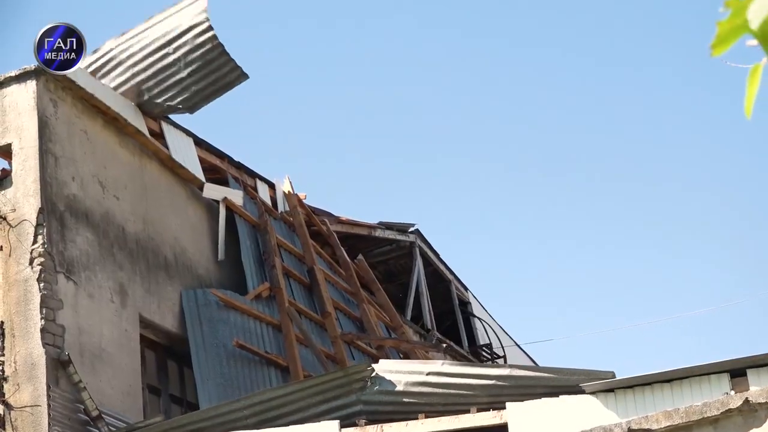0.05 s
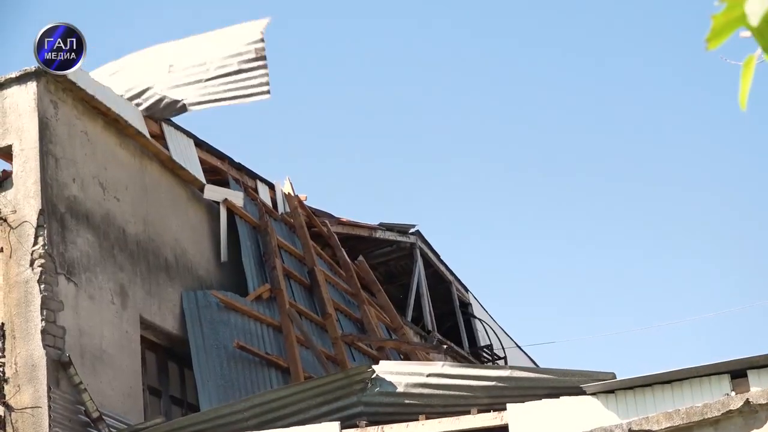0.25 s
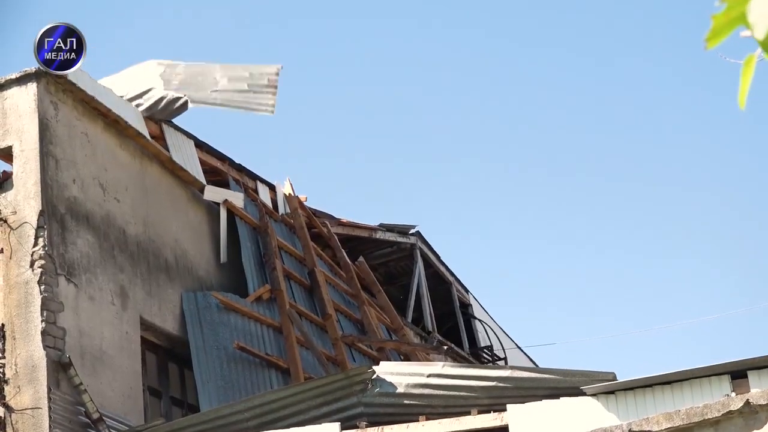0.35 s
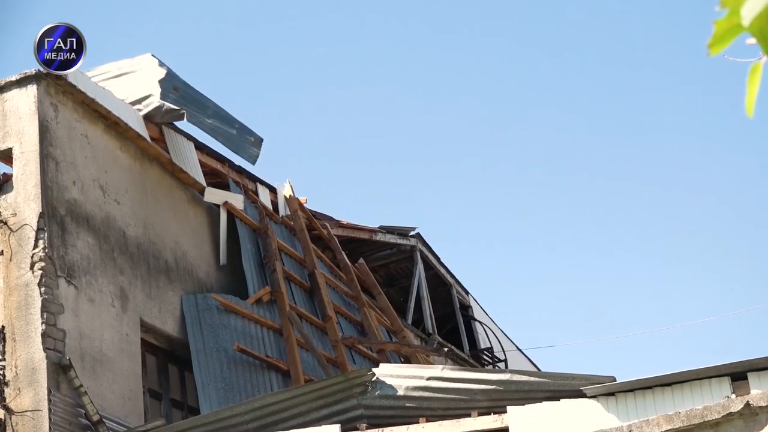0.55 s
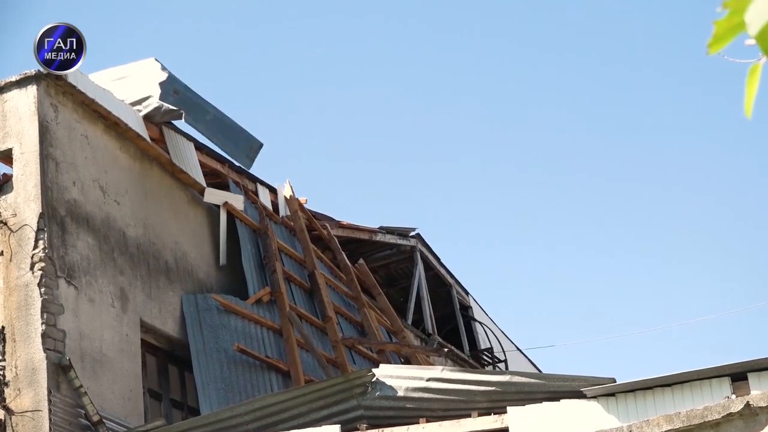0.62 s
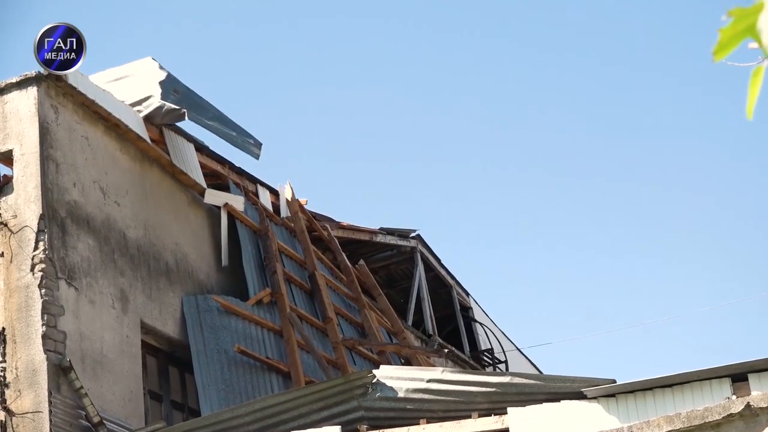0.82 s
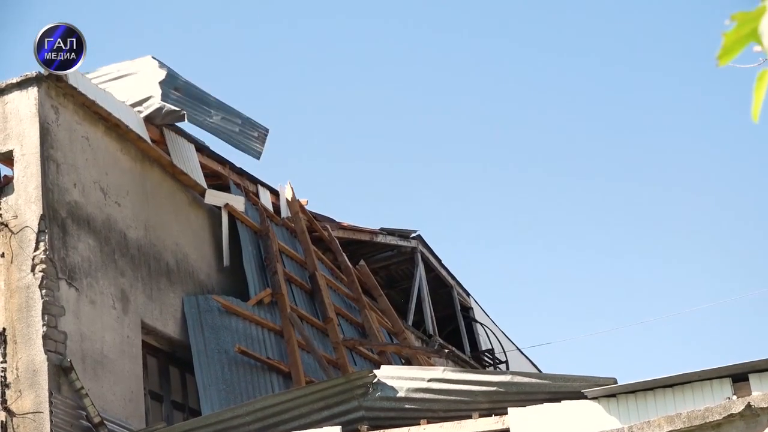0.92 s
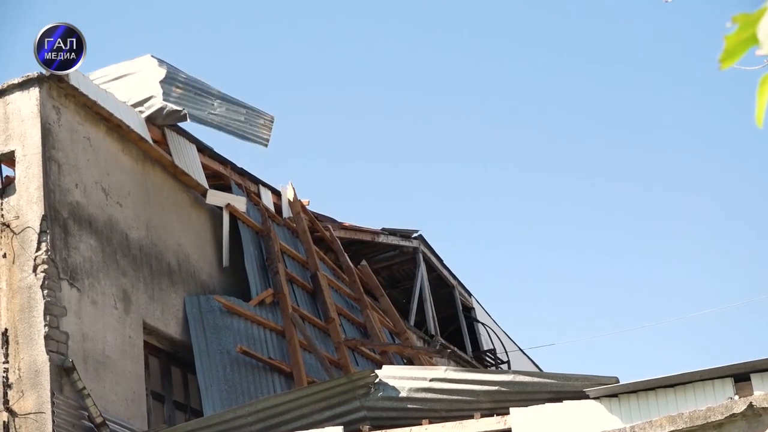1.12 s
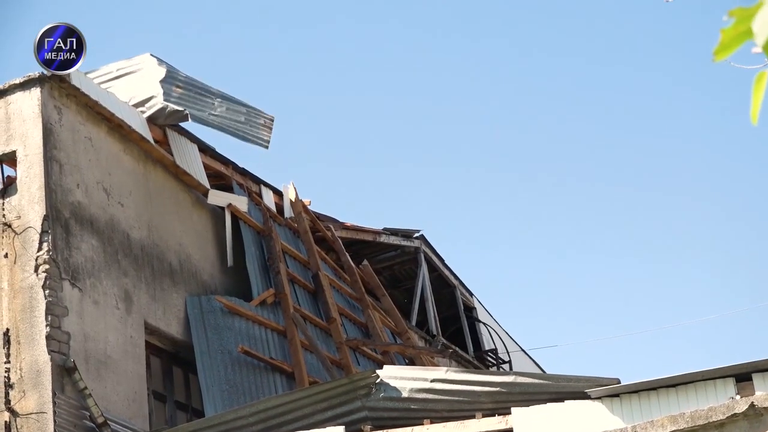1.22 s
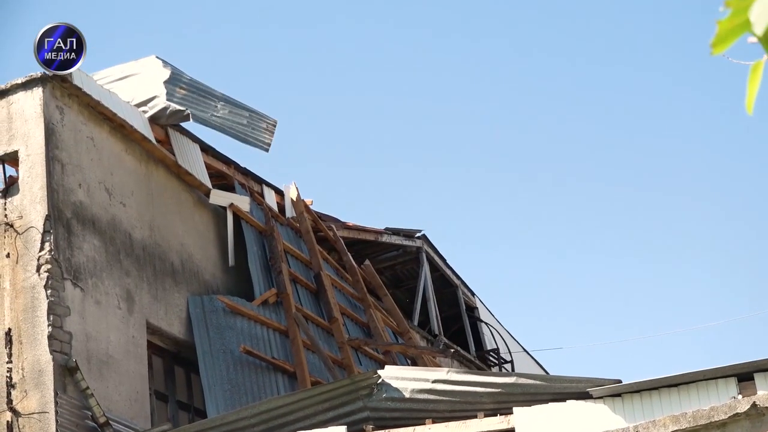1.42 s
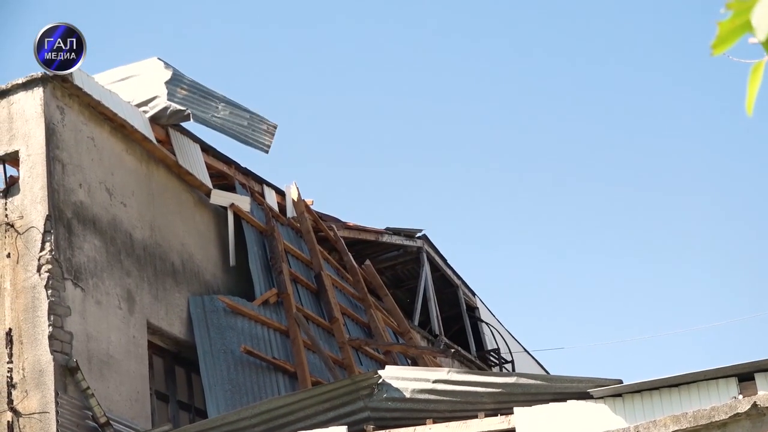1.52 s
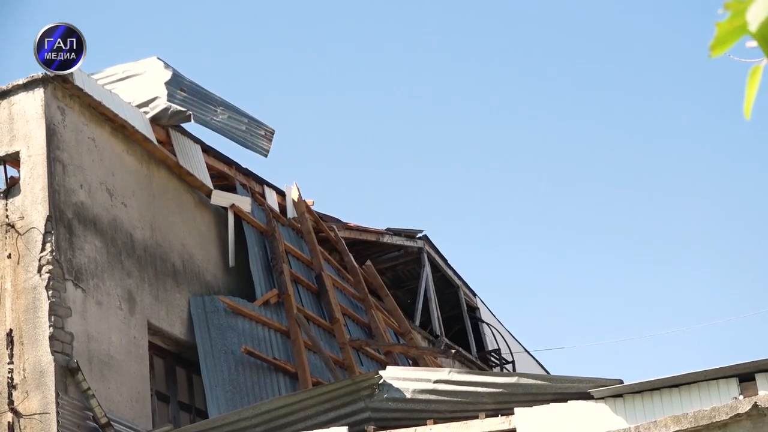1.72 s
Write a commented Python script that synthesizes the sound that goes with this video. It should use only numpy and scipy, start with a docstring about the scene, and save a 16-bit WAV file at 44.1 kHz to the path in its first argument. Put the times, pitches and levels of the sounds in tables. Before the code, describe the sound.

A loose corrugated metal sheet bangs on roof timbers in a quick, ringing clatter, echoing dully off walls outdoors. The crashes die away, leaving soft low drumming and steady wind, with a faint scrape and a distant peep.

```python
"""A steady wind rumbles and hisses from the start; the background level begins slightly low and rises.
A loose corrugated roofing sheet drums in the wind and crashes on the roof timbers, hardest at about 0.6 s.
Each blow is a chatter of tiny contacts that sets the thin metal ringing; the walls throw back a dull echo.
After 0.9 s the crashes die away, leaving the low drumming with brief, soft swells in it.
The sheet's edge scrapes once, and near the end comes a thin, faraway peep."""
import sys
import numpy as np
from scipy import signal
from scipy.fft import rfft, irfft
from scipy.io import wavfile
from scipy.ndimage import uniform_filter1d

SR = 44100
rng = np.random.default_rng(int(sys.argv[2]) if len(sys.argv) > 2 else 0)


def bounce(signal):
    """Save signal as a 16-bit WAV file at the path given by the first command-line argument."""
    frames = np.transpose(np.atleast_2d(signal))
    limited = np.clip(frames, -1, 1)
    pcm = np.round(limited * 32767).astype(np.int16)
    wavfile.write(sys.argv[1], SR, pcm)


N = 77175
T, HZ = np.arange(N) / SR, np.fft.rfftfreq(N, 1 / SR)


def amp(db):
    """Turns decibels into a number to multiply by."""
    return 10 ** (np.asarray(db) / 20)


def unit(x):
    """Scales a signal to an average size (rms) of 1."""
    return x / np.sqrt(np.mean(x ** 2) + 1e-20)


def read(points, hz):
    """Looks up a frequency in a table, sliding smoothly between its rows."""
    row_hz, value = np.transpose(points)
    return np.interp(np.log(hz + 1), np.log(row_hz + 1), value)


def colour(x, gain):
    """Turns each frequency of a sound up or down."""
    return irfft(rfft(x) * gain, N)


def noise(gain):
    """Noise of size 1 with the given balance of frequencies."""
    return unit(colour(rng.standard_normal(N), gain))


def bell(distance):
    """A smooth hump, highest where the distance is zero."""
    return np.exp(-.5 * distance ** 2)


def noise_band(hz, octaves):
    """Noise gathered around one pitch."""
    return noise(bell(np.log2((HZ + 1) / hz) / octaves))


def rise_and_fall(start, length):
    """A loudness curve that rises quickly and falls back to silence."""
    return np.sin(np.pi * np.sqrt(np.clip((T - start) / length, 0, 1)))


# The wind's tone. Each row: frequency in Hz, relative level in dB.
WIND_TONE = [(10, -40), (22, -1.5), (85, -1.5), (117, -8.5), (230, -3), (325, -11.5), (490, -9.5),
             (750, -15), (1100, -14.5), (2700, -17.5), (5000, -18), (6500, -24), (8000, -30.5),
             (10000, -31), (11800, -45)]
# How much that tone wavers. Each row: frequency in Hz, typical swing in dB.
WIND_WAVER = [(100, 1.5), (700, 1.5), (3000, .6), (8000, .4)]


def wind(level_db=-42, start_db=-3.5, rise_s=0.98):
    """A steady wind rumbles and hisses. The background level starts slightly low and rises."""
    hz, _, spectrum = signal.stft(rng.standard_normal(N), SR, nperseg=2048, noverlap=1536)
    patches = uniform_filter1d(rng.standard_normal(spectrum.shape), size=12, axis=0)  # blur over pitch
    patches = unit(uniform_filter1d(patches, size=7, axis=1))  # blur over time
    tone_db = read(WIND_TONE, hz)[:, None] + read(WIND_WAVER, hz)[:, None] * patches
    air = signal.istft(spectrum * amp(tone_db), nperseg=2048, noverlap=1536)[1][:N]
    return unit(air) * amp(level_db + start_db * np.exp(-T / rise_s))


# The sheet's low notes. Each row: pitch in Hz, spread to either side in Hz, level in dB.
DRUM_NOTES = [(182, 18, -54), (218.5, 15, -51.5), (287, 13, -56.5)]


def drumming(start_s=0.028):
    """The wind keeps the sheet's lowest notes humming."""
    hum = sum(amp(db) * noise(1 / (1 + ((HZ - hz) / width) ** 2)) for hz, width, db in DRUM_NOTES)
    return hum * np.clip((T - start_s) / .01, 0, 1)


CONTACTS_PER_S = 420


def contacts(start, length, dice, spread_db=5):
    """One blow is a chatter of contacts: gives the sample each lands on and its share of the energy."""
    delay = (np.arange(len(dice)) + dice[:, 0] - dice[0, 0]) / CONTACTS_PER_S
    strength = amp(spread_db * (2 * dice[:, 1] - 1))
    energy = strength ** 2 * np.exp(-(delay / length) ** 4)
    return np.round((start + delay) * SR).astype(int), energy / energy.sum()


def fade(power, fade_s):
    """Stored energy leaks away. A fade time, here and below, is the time it takes to drop 60 dB."""
    return signal.lfilter([1], [1, -np.exp(-np.log(1e6) / (fade_s * SR))], power)


def wall_echo(power, fade_s, delay_s=0.021, build_s=0.0067):
    """Energy comes back from the walls a little late, builds up and fades."""
    hold = np.exp(-1 / (build_s * SR))
    echo = signal.lfilter([1 - hold], [1, -hold], fade(power, fade_s))
    return np.interp(T - delay_s, T, echo, left=0)


# The blows on the timbers. Each row: start in seconds, length of the chatter in seconds,
# then the strength in dB of the bass, the clang, the crack and the treble.
BLOW_LIST = [(0.0361, 0.0059, -30, -28, -33.5, -34), (.096, 0.0054, -29.5, -30, -39, -50),
             (0.113, 0.0025, -53, -42, -62, -42), (0.189, 0.014, -41, -37, -22.5, -24.5),
             (0.201, 0.0062, -27, -17, -17, -20), (.266, 0.011, -33, -29.5, -24, -34),
             (0.329, 0.0061, -30.5, -25, -21.5, -21), (.345, 0.0041, -32.5, -27, -21.5, -17),
             (.359, 0.0027, -24.5, -26.5, -24, -43), (0.438, 0.021, -34, -27.5, -37, -30),
             (.460, 0.018, -18, -21.5, -21.5, -25), (0.516, 0.017, -24, -23, -19.5, -24),
             (.564, 0.0052, -22, -39, -42, -49), (.595, 0.007, -21.5, -14.5, -21, -15.5),
             (0.6061, 0.0025, -15, -20.5, -13.5, -10.5), (0.618, 0.012, -19, -22.5, -12.5, -14.5),
             (0.649, 0.0037, -17.5, -17, -18.5, -25), (.683, 0.012, -22.5, -19.5, -22.5, -25.5),
             (0.732, 0.014, -29, -14.5, -15, -19.5), (.857, 0.0027, -27.5, -22, -20, -20)]
# Where bass, clang, crack and treble lie, in Hz.
BLOW_PITCHES = [450, 2200, 4700, 8000]
# The metal's tone. Each row: frequency in Hz, relative level in dB.
METAL_TONE = [(60, -63), (110, -13.5), (215, -3.5), (280, -0.5), (325, -10.5), (480, 0.5), (570, -6.5),
              (660, -1), (800, -8.5), (900, -2), (1300, -5), (2000, -3.5), (4700, -4.5), (5700, -10),
              (7100, -15), (9000, -16.5), (11000, -28), (12000, -62)]
# How each band of pitches dies away. Each row: centre in Hz, fade time of the metal in seconds,
# fade time of the wall echo in seconds, level of the echo in dB next to the metal.
BAND_FADES = [(150, 0.36, 1.9, -6.5), (410, 0.27, 1.16, -11), (930, 0.28, 1.28, -6.5), (1990, 0.36, .9, -9),
              (3700, 0.23, 0.54, -9), (5350, 0.28, 0.18, -25), (8640, 0.19, 0.15, -7.5),
              (10800, 0.095, 0.29, -37)]


def crashes(waves_per_s=9000, wave_spread_db=2.5, snap_db=-4.5, snap_fade_s=0.023, click_db=-3.5):
    """Each contact clicks and sends ripples through the metal, which bounce off its ribs and edges."""
    dice = rng.random(size=(len(BLOW_LIST), 40, 2))  # random timing and strength of each contact
    chatters = [contacts(blow[0], blow[1], rolls) for blow, rolls in zip(BLOW_LIST, dice)]
    metal = unit(amp(read(METAL_TONE, HZ)))
    sign = rng.choice([-1., 1.], N)
    arrivals = rng.random(N) < waves_per_s / SR
    sizes = amp(wave_spread_db * np.minimum(rng.exponential(1, N), 4))
    ripples = unit(sign * arrivals * sizes)
    centres = [row[0] for row in BAND_FADES]
    out = np.zeros(N)
    for (hz, ring_s, echo_s, echo_db), this_band in zip(BAND_FADES, np.eye(len(BAND_FADES))):
        band = metal * read(list(zip(centres, this_band)), HZ)
        power = np.zeros(N)
        for blow, (samples, share) in zip(BLOW_LIST, chatters):
            blow_db = read(list(zip(BLOW_PITCHES, blow[2:])), hz)
            power[samples] += share * amp(blow_db) ** 2
        snap = amp(snap_db) ** 2 * fade(power, snap_fade_s)  # the struck spot rings very briefly
        echo = amp(echo_db) ** 2 * wall_echo(power, echo_s)
        out += colour(ripples, band) * np.sqrt(snap + fade(power, ring_s) + echo)
        clicks = sign * np.sqrt(power * SR / CONTACTS_PER_S)
        out += amp(click_db) * colour(clicks, band)
    return out


# The sheet's lasting notes. Each row: pitch in Hz, level in dB next to the clatter.
RINGING_NOTES = [(236, -3.5), (400, 2), (495, -9), (641, -28), (890, -9), (1357, -9.5), (1417, -15),
                 (1893, -11.5), (1986, 1), (2283, -9), (2347, -15), (2895, -7), (3218, 1), (3780, 5),
                 (4140, -7), (4674, -14), (4834, -3)]


def ringing(clatter, level_db=-2, width_hz=10.6, bright_db=-8, bright_width_hz=36, bright_count=70):
    """Passes the clatter on with the sheet's own notes ringing in it; narrower notes ring longer."""
    notes = sum(amp(db) / (1 + 2j * (HZ - hz) / width_hz) for hz, db in RINGING_NOTES)
    pitches = rng.uniform(1000, 10500, size=bright_count)
    signs = rng.choice([-1, 1], size=bright_count)
    bright = sum(sign / (1 + 2j * (HZ - hz) / bright_width_hz) for hz, sign in zip(pitches, signs))
    return colour(clatter, amp(level_db) * (1 + notes + amp(bright_db) * bright))


# Swells in the drumming. Each row: loudest moment in seconds, spread in time in seconds,
# pitch in Hz, spread in pitch in octaves, level in dB.
DRUM_SWELLS = [(0.106, 0.0094, 243, 0.31, -42), (1.06, 0.026, 215, .3, -42.5),
               (1.115, 0.02, 415, 0.38, -40.5), (1.184, 0.02, 694, 0.31, -45.5),
               (1.268, 0.011, 237, 0.23, -42.5), (1.444, 0.011, 219, 0.25, -46),
               (1.454, 0.038, 556, 0.55, -48), (1.512, 0.023, 990, 0.98, -43.5),
               (1.582, 0.034, 774, 0.54, -51), (1.683, 0.013, 232, 0.5, -42.5)]


def drum_swells():
    """Brief, soft swells come and go in the low drumming."""
    return sum(amp(db) * bell((T - peak_s) / spread_s) * noise_band(hz, octaves)
               for peak_s, spread_s, hz, octaves, db in DRUM_SWELLS)


# Hollow knocks. Each row: start in seconds, pitch in Hz, fade time in seconds, level in dB.
TIMBER_KNOCKS = [(.351, 380, 0.23, -32.5), (0.4, 1400, 0.14, -46), (.351, 870, 0.12, -30),
                 (.461, 646, .1, -23), (.609, 503, 0.17, -25)]


def knocks(rise_s=0.0039):
    """The heavier landings on timber ring a hollow note or two."""
    out = np.zeros(N)
    for start, hz, fade_s, db in TIMBER_KNOCKS:
        age = np.maximum(T - start, 0)
        loudness = amp(db - 60 * age / fade_s) * np.minimum(age / rise_s, 1)
        out += loudness * np.sin(2 * np.pi * hz * age)
    return out


# A scrape. Each row: start in seconds, length in seconds, pitch in Hz, spread in octaves, level in dB.
EDGE_SCRAPES = [(1.173, .04, 9600, 0.15, -55.5)]


def scrape():
    """The loose edge of the sheet slides briefly with a thin hiss."""
    return sum(amp(db) * rise_and_fall(start, length) * noise_band(hz, octaves)
               for start, length, hz, octaves, db in EDGE_SCRAPES)


# A high peep. Each row: start in seconds, length in seconds, pitch in Hz, level in dB.
FAR_PEEPS = [(1.536, .07, 7430, -54)]


def peep(width_hz=160):
    """A faint, thin whistle far away comes in quickly and fades."""
    return sum(amp(db) * rise_and_fall(start, length) * noise(bell((HZ - hz) / width_hz))
               for start, length, hz, db in FAR_PEEPS)


# How wide the crashes sound. Each row: frequency in Hz, width in dB (nearer zero is wider).
CRASH_WIDTH = [(60, -57), (130, -43), (270, -34), (570, -23), (1210, -20), (5400, -21.5), (11400, -19)]
# How wide the wind and the soft sounds are, with the same columns.
WIND_WIDTH = [(130, -57), (270, -42), (570, -26), (1210, -18), (2550, -15), (11400, -14)]


def widen(x, width, lean):
    """Scattered echoes reach the two ears slightly out of step; lean nudges the sound to the left."""
    scatter = unit(uniform_filter1d(rng.standard_normal(len(HZ)), size=20))
    side = colour(x, (lean + 1j * scatter) * amp(read(width, HZ)))
    return np.array([x + side, x - side])


def scene():
    """The crashing sheet ahead, with the wind and the soft sounds around it."""
    loud = widen(ringing(crashes()) + knocks(), CRASH_WIDTH, lean=.08)
    soft = widen(drumming() + drum_swells() + wind() + peep() + scrape(), WIND_WIDTH, lean=.3)
    return loud + soft


def record(dry):
    """Cuts away the very highest treble, above 11750 Hz."""
    treble_cut = signal.firwin(255, 11750, window=("kaiser", 9), fs=SR)
    return signal.oaconvolve(dry, treble_cut[None], "same")


dry = scene()
out = record(dry)
bounce(out)
```